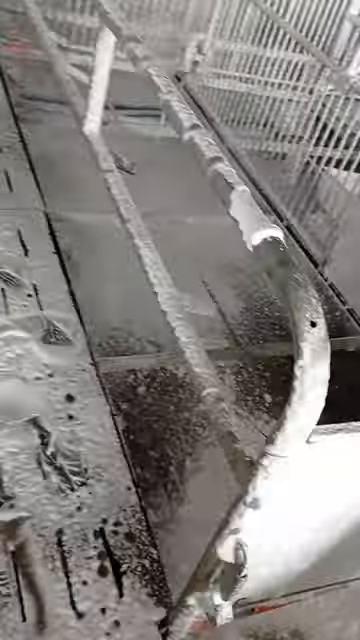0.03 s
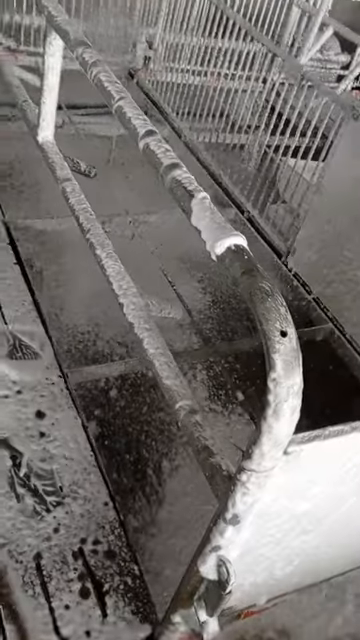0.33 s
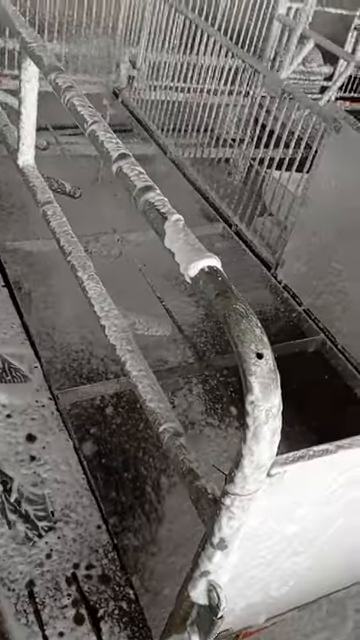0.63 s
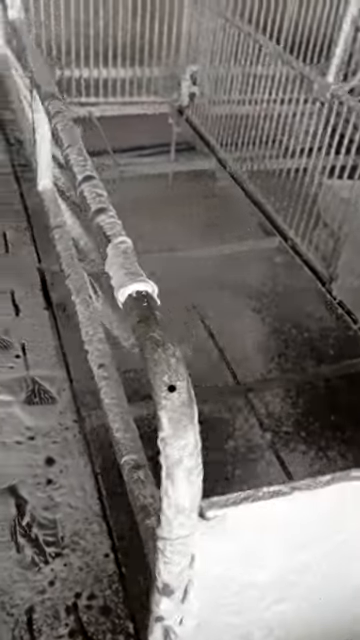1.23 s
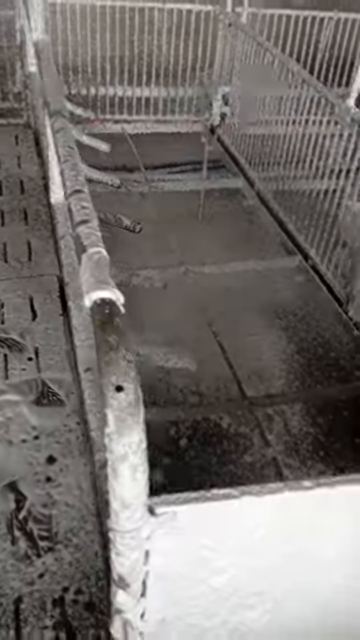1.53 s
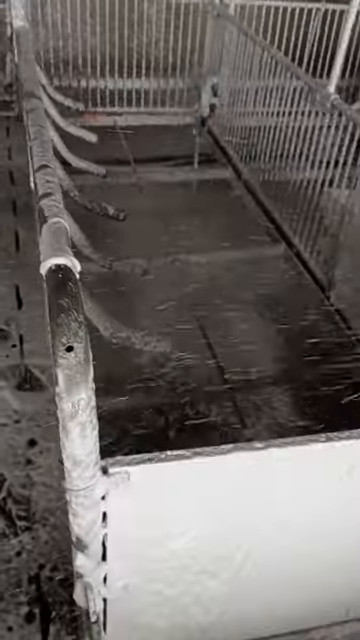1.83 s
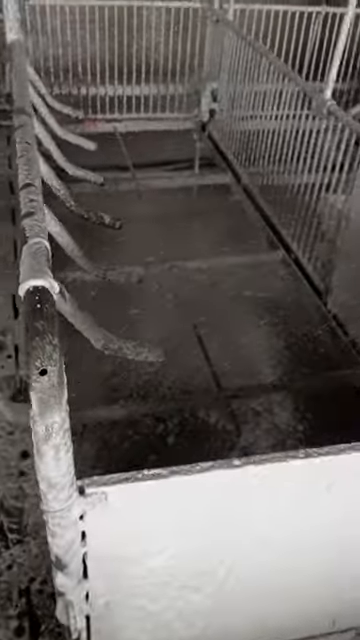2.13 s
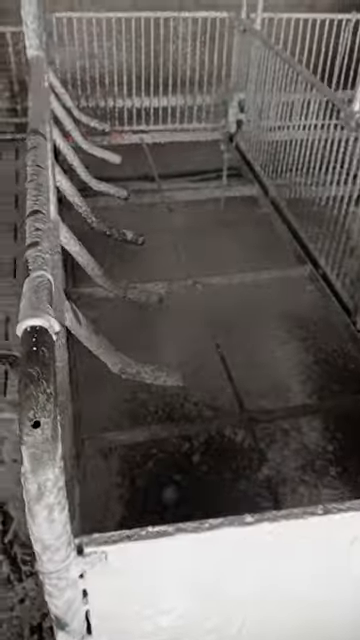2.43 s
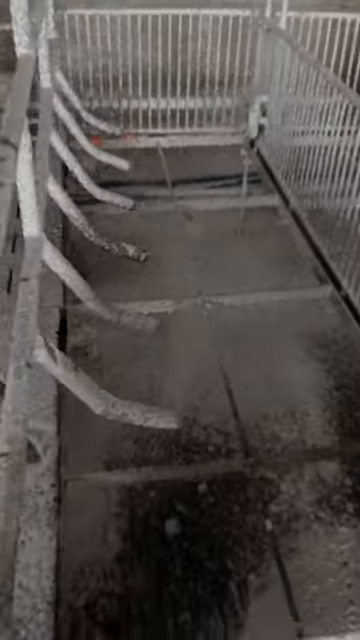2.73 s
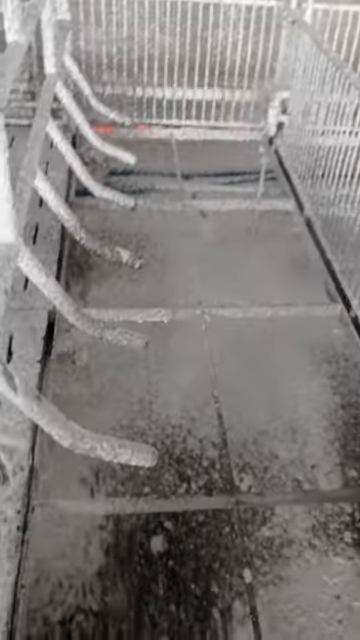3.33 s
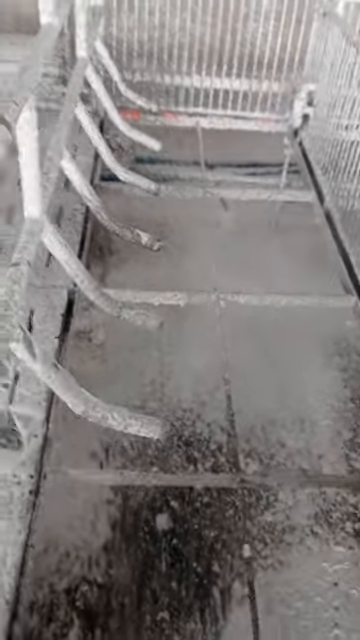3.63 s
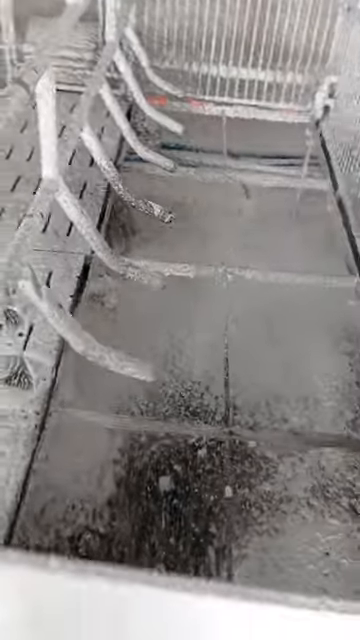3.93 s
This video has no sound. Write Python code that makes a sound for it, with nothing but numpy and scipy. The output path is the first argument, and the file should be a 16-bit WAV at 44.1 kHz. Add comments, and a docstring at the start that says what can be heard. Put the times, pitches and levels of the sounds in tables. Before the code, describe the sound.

Foam jets from a pressure nozzle with a loud, continuous, close hiss that wavers in brightness. Farther out in an animal pen, the spray splatters on the wet floor and briefly booms against hollow panels a few times.

```python
"""Foam lance in a barn pen

A pressure lance sprays foam over a pen, heard in mono from just behind the nozzle.
Close up, the jet hisses and sputters, dulling whenever it swings away. Out in the pen the foam
splashes on the floor and drums on hollow panels. Far off, a pump hums under a low rumble."""
import sys
import numpy as np
from scipy.fft import rfft, irfft, next_fast_len
from scipy.io import wavfile
from scipy.ndimage import map_coordinates

SR = 44100
rng = np.random.default_rng(int(sys.argv[2]) if len(sys.argv) > 2 else 0)


def to_wav(s):
    """Save 16-bit WAV."""
    ch = np.atleast_2d(s).T  # columns
    pcm = np.round(np.clip(ch, -1, 1) * 32767)  # PCM
    wavfile.write(sys.argv[1], SR, pcm.astype(np.int16))


N = 176400

# Four rising bands at the microphone: hiss, a ring around 6.6 kHz, mist, and the finest treble # peaking near
# 15 kHz. # The mist drops when the fan of spray turns away, the finest treble further still. # # Each row: time
# in seconds, level in dB.
HISS_LEVEL = [(0.01, -28.5), (0.18, -28.5), (0.28, -30.8), (0.55, -28.5), (0.81, -28), (1.05, -35.4),
              (1.08, -32.8), (1.29, -37.5), (1.42, -31.0), (1.48, -33.5), (1.59, -29.5), (1.83, -27),
              (1.99, -30), (2.46, -29.5), (2.65, -32.5), (2.79, -35.7), (2.98, -39), (3.06, -31.4),
              (3.25, -30.8), (3.37, -33.5), (3.52, -27.5), (3.67, -34.5), (3.88, -36.8), (4.0, -37)]
RING_LEVEL = [(0.01, -31), (0.04, -30), (0.42, -30.4), (0.55, -27.0), (0.91, -29), (1.05, -37.5),
              (1.11, -30.5), (1.29, -34.5), (1.42, -26.5), (1.48, -28.8), (1.69, -26), (2.1, -27.3),
              (2.17, -30), (2.67, -30), (2.79, -36.5), (2.88, -34.5), (2.94, -41.5), (3.1, -28.5),
              (3.15, -33.5), (3.27, -30.5), (3.31, -34.8), (3.54, -29.5), (3.85, -41.5), (4.0, -38.4)]
MIST_LEVEL = [(0.01, -39), (0.3, -42), (0.64, -39.6), (0.84, -39), (1.05, -53), (1.11, -43.9), (1.26, -52),
              (1.42, -42), (1.9, -40.5), (2.13, -40.8), (2.38, -41.5), (2.62, -41.5), (2.79, -49.7),
              (2.85, -47.8), (2.94, -53.4), (3.06, -41.5), (3.15, -47.5), (3.21, -42.8), (3.31, -48),
              (3.4, -45), (3.52, -38), (3.67, -48), (3.88, -51), (4.0, -48)]
FINE_LEVEL = [(0.01, -42.1), (0.48, -44), (0.57, -40.2), (0.84, -42), (0.96, -53.4), (1.05, -54.0),
              (1.11, -46.1), (1.26, -57.6), (1.32, -47.3), (1.42, -45.4), (1.53, -43.6), (1.83, -40),
              (2.02, -45.3), (2.1, -41.5), (2.65, -45.1), (2.71, -52.0), (2.88, -55.7), (2.92, -60.5),
              (3.06, -42.3), (3.15, -51.2), (3.21, -43.8), (3.31, -51.9), (3.52, -39.3), (3.6, -47.7),
              (3.75, -56.0), (4.0, -53.4)]
# The spectra of those bands. Each row: frequency in Hz, relative level in dB.
HISS_COLOUR = [(900, -34), (1700, -6.5), (2300, -4), (2900, 0.5), (3500, -.5), (4100, 0), (4900, -3),
               (5600, -8), (6800, -16), (9000, -45)]
RING_COLOUR = [(4000, -42), (5200, -7), (5800, -4), (6250, -1.5), (6580, -0.5), (6950, -3.5),
               (7450, -7.5), (8000, -15), (9000, -20), (10500, -29), (13000, -40)]
MIST_COLOUR = [(5500, -31), (7500, 1), (8600, 1), (9600, -1.5), (10700, -7), (12000, -19), (14000, -35)]
FINE_COLOUR = [(9000, -25), (10700, -8.5), (11600, -6.5), (12500, -8.5), (13900, -9), (14600, 0.5),
               (15900, 0.5)]


def jet():
    """Air and foam tear out of the nozzle just ahead; one unsteady flow shakes all four bands."""
    sputter_db = 0.46 * wobble(per_second=170)
    surge_db = 0.14 * wobble(per_second=19)
    hiss = amp(0.66) * level(HISS_LEVEL) * coloured(pen_echoes(spray(grain_db=-6.5)), HISS_COLOUR)
    flicker = amp(0.5 + 0.29 * wobble(per_second=90))
    ringing = flicker * level(RING_LEVEL) * coloured(pen_echoes(spray(grain_db=-5.5)), RING_COLOUR)
    mist = level(MIST_LEVEL) * coloured(spray(grain_db=-10), MIST_COLOUR)
    fine = level(FINE_LEVEL) * coloured(spray(grain_db=-2), FINE_COLOUR)
    return amp(sputter_db + surge_db) * (hiss + ringing + mist + fine)


def spray(grain_db, drops_per_s=2600):
    """Turbulent noise with a dense rain of droplet impulses, set grain_db relative to the noise."""
    struck = rng.random(N) < drops_per_s / SR
    sizes = np.exp(0.47 * rng.standard_normal(N))
    drops = struck * sizes * np.sign(rng.standard_normal(N))
    return unit(rng.standard_normal(N) + amp(grain_db) * unit(drops))


# Foam splashing on the floor and drumming on panels and troughs.
# Each row: time in seconds, level in dB.
SPLASH_LEVEL = [(0.01, -32), (0.07, -32.4), (0.36, -30.5), (0.48, -31.5), (0.76, -32.5), (0.96, -35),
                (1.21, -33), (1.48, -37.5), (1.62, -34), (1.83, -33), (2.04, -35.5), (2.44, -29.3),
                (2.62, -31), (2.77, -35.5), (2.94, -37), (3.06, -31.5), (3.21, -30.6), (3.54, -30.5),
                (3.85, -36.5), (4.0, -35.4)]
DRUM_LEVEL = [(0.01, -46.5), (0.12, -43), (0.88, -43.5), (0.94, -35.5), (1.05, -34), (1.21, -36.5),
              (1.29, -33.5), (1.53, -41), (1.86, -40), (2.19, -44.5), (2.46, -40.5), (2.71, -39),
              (3.12, -38.5), (3.42, -31), (3.69, -40.5), (4.0, -39)]
# The spectra of splash and drumming. Each row: frequency in Hz, relative level in dB.
SPLASH_COLOUR = [(200, -38), (450, -8.5), (700, -2.5), (1000, -1.5), (1200, 0.5), (1600, -.5), (1900, -1.5),
                 (2300, -3), (3200, -13.5), (6000, -21)]
DRUM_COLOUR = [(90, -40), (160, -15), (195, -4.5), (240, -3), (282, -1), (325, -1), (400, 0), (520, -1),
               (700, -2), (1000, -9), (2000, -33), (4000, -42)]


def foam_landing():
    """Beyond the nozzle, foam splashes on the wet floor and drums on hollow parts of the pen."""
    splash = level(SPLASH_LEVEL) * coloured(pen_echoes(spray(grain_db=-4)), SPLASH_COLOUR)
    drum = level(DRUM_LEVEL) * coloured(pen_echoes(spray(grain_db=-5.5)), DRUM_COLOUR)
    return amp(0.56) * splash + amp(0.1) * drum


# The jet catches a hollow panel.
# Each row: time of the peak in seconds, half-length in seconds, pitch in Hz, level in dB.
PANEL_BOOMS = [(0.941, .025, 235, -41), (1.281, .025, 247, -37.5), (3.41, 0.032, 555, -32.5)]


def panel_booms():
    """Out in the pen, a panel rings in a brief hollow swell as the jet crosses it."""
    t, out = np.arange(N) / SR, np.zeros(N)
    for peak_s, half_s, hz, db in PANEL_BOOMS:
        width_hz = 0.18 * hz
        ring = filtered(rng.standard_normal(N), lambda f: np.exp(-.5 * ((f - hz) / width_hz) ** 2))
        swell = np.exp(-2 * ((t - peak_s) / half_s) ** 2)
        out += amp(db) * unit(ring * swell) * np.sqrt(np.mean(swell ** 2))
    return out


def pen_echoes(x, count=10, spread_s=0.025, drift_s=0.000602, echo_db=-12.5):
    """x with early echoes off floor, partitions and walls; their delays drift as the lance moves."""
    t, echoes = np.arange(N) / SR, np.zeros(N)
    for fraction in rng.random(count):
        delay = fraction * spread_s + drift_s * np.abs(wobble(per_second=1))
        echoes += np.interp(t - delay, t, x, left=0)
    return unit(x + amp(echo_db) * unit(echoes))


# The pump's hum from across the barn. Each row: time in seconds, level in dB.
PUMP_LEVEL = [(0, -79), (.55, -77), (.72, -66), (1.15, -60), (1.7, -65), (2.3, -64.5), (2.85, -62),
              (3.25, -63), (3.7, -74), (3.88, -61)]


def pump(hum_hz=66, wander_hz=2.5):
    """Far from the microphone a pump hums, wavering in pitch and loudness."""
    pitch_hz = hum_hz + wander_hz * wobble(per_second=14)
    phase = 2 * np.pi * np.cumsum(pitch_hz) / SR
    hum = unit(np.sin(phase) * amp(4.1 * wobble(per_second=13)))
    return amp(-3.5) * level(PUMP_LEVEL) * hum


# The low rumble in the barn. Each row: time in seconds, level in dB.
RUMBLE_LEVEL = [(0.01, -64), (0.46, -63.2), (0.81, -62.3), (0.99, -58), (1.21, -54.0), (1.75, -62.5),
                (1.99, -62), (2.13, -64), (2.25, -59.4), (2.44, -60.2), (2.88, -53.5), (3.42, -53.5),
                (3.69, -62), (4.0, -54)]
# Its spectrum. Each row: frequency in Hz, relative level in dB.
RUMBLE_COLOUR = [(20, -21), (45, -20), (75, -9), (100, 1), (113, -4), (135, 0.5), (170, 0), (240, -12),
                 (500, -40)]


def barn_rumble():
    """Low noise rises and falls in the background."""
    return amp(0.5) * level(RUMBLE_LEVEL) * coloured(rng.standard_normal(N), RUMBLE_COLOUR)


def amp(db):
    """Decibels to gain."""
    return 10 ** (np.asarray(db) / 20)


def unit(x):
    """Scale to rms 1."""
    return x / np.sqrt(np.mean(x ** 2) + 1e-20)


def level(rows):
    """Gain per sample from rows of seconds and dB."""
    seconds, db = np.transpose(rows)
    return amp(np.interp(np.arange(N) / SR, seconds, db))


def wobble(per_second):
    """A smooth random curve with this many knots a second."""
    return map_coordinates(rng.standard_normal(4096), [np.arange(N) * per_second / SR], mode="wrap")


def filtered(x, response):
    """x through a filter whose gain is a function of frequency in Hz."""
    size = next_fast_len(N + 8192)
    return irfft(rfft(x, size) * response(np.fft.rfftfreq(size, 1 / SR)), size)[..., :N]


def coloured(x, rows):
    """x shaped by a spectrum given as rows of Hz and dB, at rms 1."""
    row_hz, db = np.transpose(rows)
    gain = lambda hz: amp(np.interp(np.log(hz + 1), np.log(row_hz), db, left=-100, right=-100))
    return unit(filtered(x, gain))


def scene():
    """One microphone just behind the nozzle feeds both channels alike."""
    mono = jet() + foam_landing() + panel_booms() + pump() + barn_rumble()
    return np.array([mono, mono])


def record(dry, top_hz=15840):
    """The recorder keeps nothing above its band limit."""
    return filtered(dry, lambda hz: hz < top_hz)


dry = scene()
out = record(dry)
to_wav(out)
```